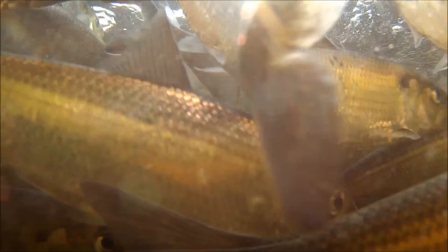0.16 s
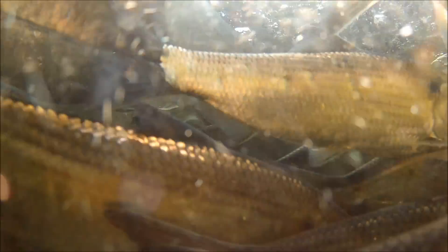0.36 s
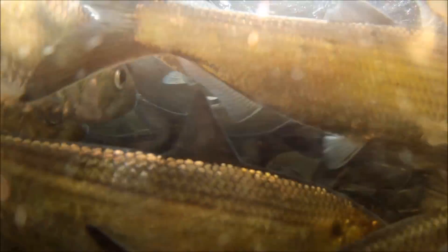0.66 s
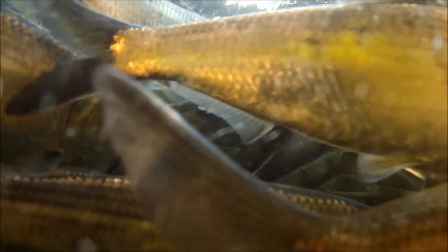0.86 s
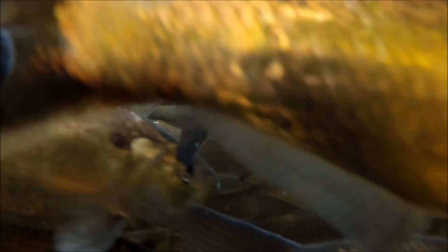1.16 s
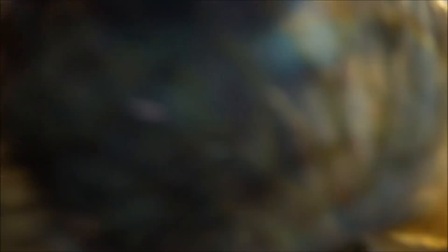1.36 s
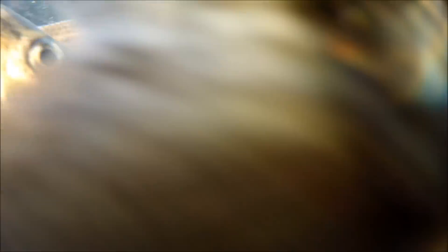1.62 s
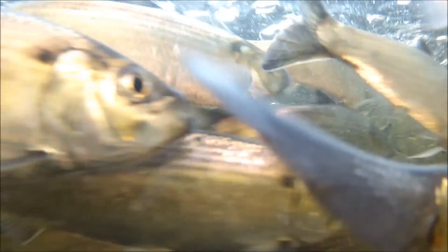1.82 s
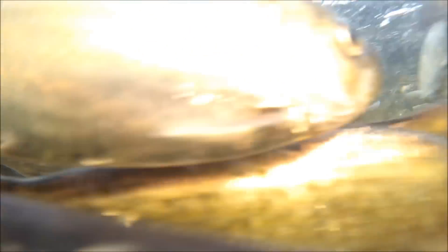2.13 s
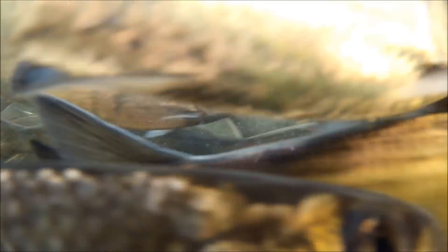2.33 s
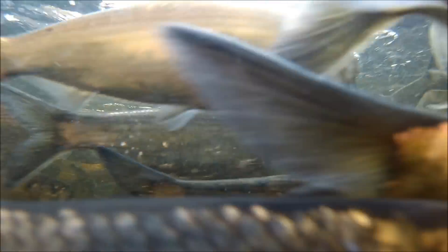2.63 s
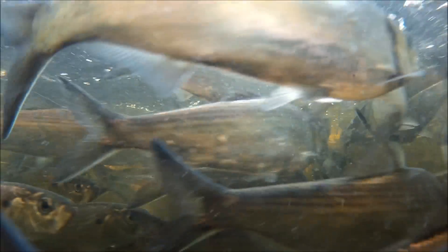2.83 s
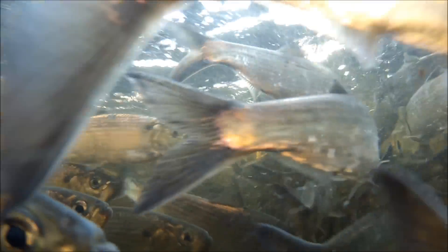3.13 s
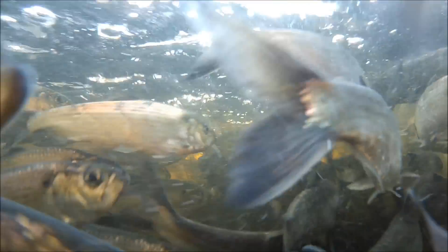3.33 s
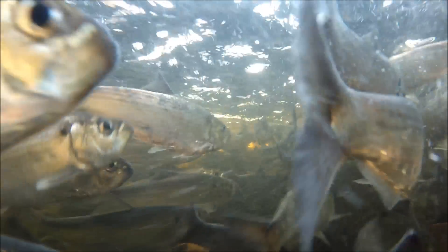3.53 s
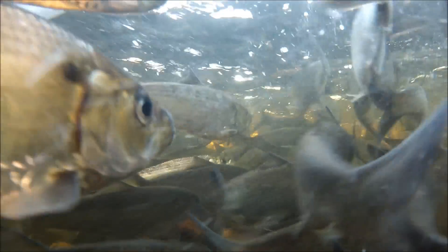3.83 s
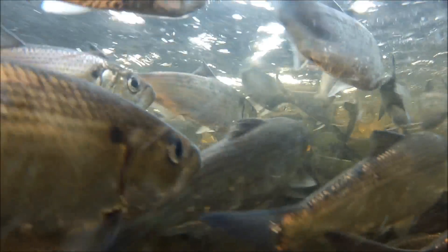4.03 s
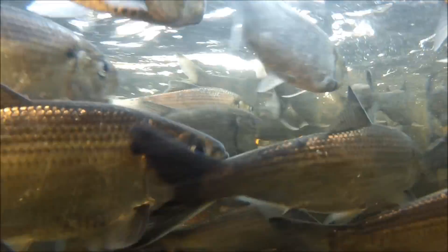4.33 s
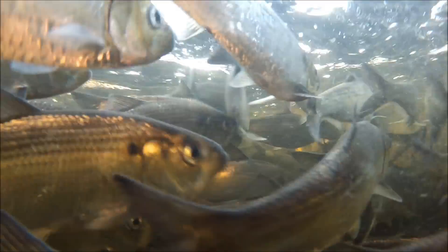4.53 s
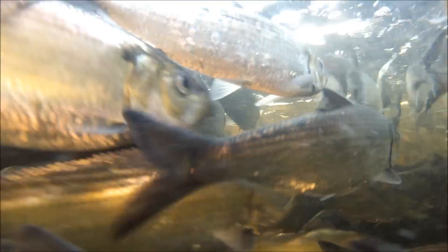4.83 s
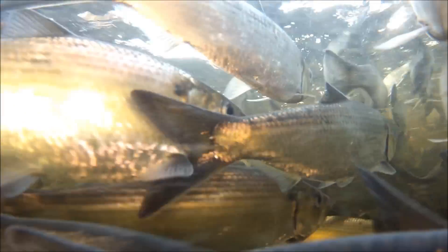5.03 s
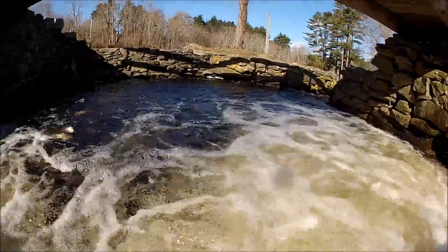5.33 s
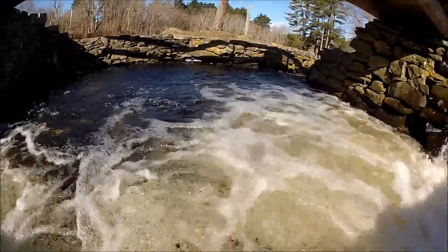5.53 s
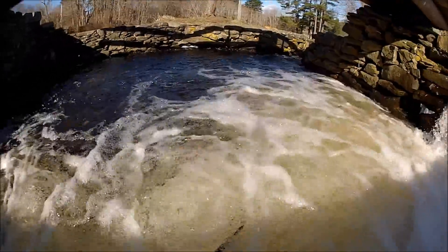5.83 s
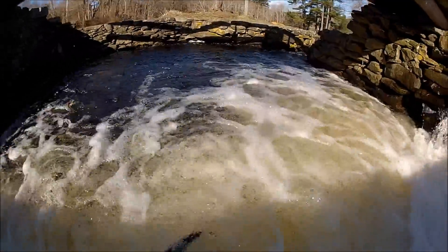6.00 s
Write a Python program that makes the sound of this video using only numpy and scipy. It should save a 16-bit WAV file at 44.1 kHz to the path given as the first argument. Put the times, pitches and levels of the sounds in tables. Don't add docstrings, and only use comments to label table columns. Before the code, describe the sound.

A microphone sealed in a small hard case lies underwater among crowding fish, slowed to quarter speed. At 0.05-0.2 s a rapid cluster of heavy thuds and a hollow knock hits, then low wobbling and soft slosh. Another double thud comes near 0.45 s. From 0.65 to 1.05 s blows crowd together, very loud and overloaded, with boxy ringing around 700 Hz and gritty skids of scales. More hard clunks fall at 1.28-1.4 s and 1.55-1.67 s, amid rumbling eddies and scrapes. Quiet follows; a smaller knock and bumps come at 2.24-2.35 s, a faint scrape and tap at 2.6 s. Until 5.2 s there is mostly dull, low current with sparse tiny ticks. Then an abrupt cut to air: broad churning white water, gurgling and spraying, builds slightly to the end, with a strong surge and low slaps at 5.4-5.5 s and another surge at 5.8 s.

```python
import sys
import numpy as np
from scipy import signal
from scipy.fft import rfft, irfft
from scipy.io import wavfile
from scipy.ndimage import uniform_filter1d

SR = 44100
rng = np.random.default_rng(int(sys.argv[2]) if len(sys.argv) > 2 else 0)


def ratio(d):
    e = np.asarray(d, float) / 20
    return 10 ** e


def store_pcm(level_fs):
    pcm = np.round(np.clip(level_fs, -1, 1) * 32767).astype(np.int16)
    wavfile.write(sys.argv[1], SR, np.atleast_2d(pcm).T)


N = 271656
CHANGE_S = 5.221


def level(x, db=0):
    return x * ratio(db) / np.sqrt(np.mean(x ** 2))


def pole_pair(x, hz, q, band):
    w = 2 * np.pi * hz
    top = [w / q, 0] if band else [1, 0, 0]
    return signal.lfilter(*signal.bilinear(top, [1, w / q, w * w], SR), x)


def walk(rate_hz):
    k = int(SR / rate_hz)
    steps = np.repeat(rng.standard_normal(N // k + 1), k)
    return uniform_filter1d(uniform_filter1d(steps, k), k)[:N]


def colour(points, peaks, lift_db):
    hz = np.fft.rfftfreq(N, 1 / SR) + 1
    centre_hz, db = np.transpose(points)
    bumps = sum(1 / (1 + (2 * (hz - f) / width) ** 2) for f, width, _ in peaks)
    smooth_db = np.interp(np.log(hz), np.log(centre_hz), db, right=-90)
    return hz, ratio(smooth_db + lift_db * bumps)


def wash(hz, gain, swell_db, flicker_db, flicker_hz):
    spectrum = rfft(rng.standard_normal(N)) * gain
    swell = swell_db * walk(1.3)
    out = 0
    for k in range(8, 27):
        mask = np.clip(1 - abs(2 * np.log2(hz) - k), 0, 1)
        out = out + irfft(spectrum * mask, N) * ratio(swell + flicker_db * walk(flicker_hz))
    return level(out)


def swells(t, events):
    rise_db_per_s, fall_db_per_s = 149, 131
    gain = 0
    for s, hold_s, db in events:
        early_s, late_s = np.maximum(s - t, 0), np.maximum(t - s - hold_s, 0)
        gain = gain + ratio(db - rise_db_per_s * early_s - fall_db_per_s * late_s)
    return gain


def add(out, s, x):
    i = int(s * SR)
    out[i:i + len(x)] += x[:N - i]


# centre [Hz], level [dB per Hz]
WEIR = [(12, -37), (20, -11), (81, -2), (144, -10.5), (183, -11.5), (274, -10), (645, -15), (879, -2.5),
        (1040, -9), (1520, -9), (2220, -5.5), (2690, -12.5), (3410, -7.5), (5490, -14.5), (5900, -15),
        (7670, -54.5), (13000, -120)]
# centre [Hz], width [Hz], level [dB], level unused
WEIR_CASE = [(310, 100, -3), (896, 52, 0), (2180, 280, -2), (3300, 520, -1)]
# start_s [s], half_length_s [s], surge_db [dB]
SURGES = [
    (5.437, 0.064, 9.5),
    (5.555, 0.0085, 5),
    (5.588, 0.014, -1),
    (5.803, 0.03, 9),
    (6.026, 0.023, 2.5),
    (6.15, 0.033, 1),
]


def weir(t):
    surge_db = sum(db * np.exp(-((t - s) / half_s) ** 2) for s, half_s, db in SURGES)
    hz, gain = colour(WEIR, WEIR_CASE, lift_db=4)
    low = 1 / (1 + (hz / 140) ** 4)
    mid = 1 / (1 + (hz / 580) ** 6)
    high = 1 / (1 + (2300 / hz) ** 4)
    gurgle_db = -47.5 + 0.62 * surge_db
    rush_db = -40 + 0.16 * surge_db + 5.5 * (t - CHANGE_S)
    spray_db = -41.5 + surge_db
    buffet_db = -48 + 0.78 * surge_db
    gurgle = ratio(gurgle_db) * wash(hz, gain * mid * (1 - low), 0.6, 1.1, 30)
    rush = ratio(rush_db) * wash(hz, gain * high, 0.41, 3.3, 25)
    spray = ratio(spray_db) * wash(hz, gain * (1 - high) * (1 - mid), 0.48, 0.9, 30)
    buffet = ratio(buffet_db) * wash(hz, gain * low, .5, 3.9, 9.6)
    return rush + spray + buffet + gurgle


# start_s [s], level_db [dB], pitch_hz [Hz], t60_s [s]
SLAPS = [
    (5.418, -26, 84, 0.087),
    (5.412, -29.5, 404, 0.12),
    (5.448, -25, 80, 0.12),
    (5.47, -23.5, 83, 0.16),
    (5.584, -32, 64.5, 0.13),
    (5.76, -37, 256, .1),
]


def slaps(t):
    out, t = np.zeros(N), t[:9000]
    for s, db, hz, t60_s in SLAPS:
        add(out, s, ratio(db) * np.sin(2 * np.pi * hz * t) * 1000 ** (-t / t60_s))
    return out


# centre [Hz], level [dB per Hz]
RIVER = [(12, -39), (20, -4), (87, -2), (114, -3), (179, -3), (382, -19), (661, -19), (1010, -32),
         (1420, -29), (2220, -28.5), (2450, -31), (4990, -30.5), (5900, -32.5), (7670, -74.5),
         (13000, -120)]
# centre [Hz], width [Hz], level [dB], level unused
CASE = [(690, 49, 0), (1200, 22, -10), (1720, 27, -10), (2201, 300, -8), (3413, 240, -12)]


def river(blows):
    river_db, recovery_s, duck_level = -52.5, .09, 0.12
    keep = np.exp(-1 / (recovery_s * SR))
    heard = signal.lfilter([1 - keep], [1, -keep], np.minimum(abs(blows), 1))
    current = wash(*colour(RIVER, CASE, lift_db=4.5), 0.4, 2.074, 16)
    return ratio(river_db) * current / (1 + heard / duck_level)


# start_s [s], hold_s [s], level_db [dB]
EDDIES = [
    (-.1, .02, -37),
    (0.186, .02, -44.5),
    (0.474, .22, -38.5),
    (0.879, .13, -44.5),
    (1.14, .1, -55.5),
    (1.317, .03, -32.5),
    (1.455, .25, -36),
    (2.343, .55, -59),
]


def eddies(t):
    rumble = pole_pair(pole_pair(rng.standard_normal(N), 75, 1.2, True), 70, .8, True)
    return level(rumble * ratio(6 * walk(30))) * swells(t, EDDIES)


# start_s [s], hold_s [s], level_db [dB]
SLOSHES = [
    (.03, 0.22, -51.5),
    (.65, .01, -65.5),
    (.85, 0.0045, -41.5),
    (1.24, 0.022, -60),
    (1.58, 0.11, -53),
    (2.27, .06, -54),
    (2.6, 0.016, -54),
]


def sloshes(t):
    slosh = pole_pair(pole_pair(rng.standard_normal(N), 390, 0.92, True), 280, 0.96, True)
    return level(slosh * ratio(5 * walk(49))) * swells(t, SLOSHES)


# start_s [s], level_db [dB], pitch_hz [Hz], t60_s [s]
ROCKING = [(0.138, -28, 100, .1), (0.191, -29.5, 111.6, 0.26), (0.465, -24, 90.3, 0.36),
           (1.34, -24, 84.7, 0.58), (1.67, -22.5, 85.7, 0.22), (1.394, -29, 92, 0.16),
           (1.439, -34, 95, 0.18), (1.701, -28.5, 84.5, 0.22), (1.79, -35.5, 48.1, 0.65),
           (2.375, -31.5, 53.7, 0.18), (2.601, -35.5, 59.3, 0.16), (0.272, -36, 140, 0.29)]


def rocking():
    out, t = np.zeros(N), np.arange(SR // 2) / SR
    wander = 1 + .25 * walk(40)
    for s, db, hz, t60_s in ROCKING:
        turns = np.cumsum(hz * wander[int(s * SR):][:len(t)]) / SR
        add(out, s, -ratio(db) * np.sin(2 * np.pi * turns) * 1000 ** (-t / t60_s))
    return out


# centre [Hz], level [dB per Hz]
GRIT = [(150, -20.5), (600, 0.5), (1500, -7), (3000, -7), (4500, -16), (5800, -11)]


def grit():
    unevenness_db = 5.6 * rng.standard_normal(N // 40 + 1).repeat(40)[:N]
    clicks = rng.standard_normal(N) * ratio(unevenness_db)
    _, gain = colour(GRIT, CASE, lift_db=7)
    return level(irfft(rfft(clicks) * gain, N))


# start_s [s], length_s [s], grit_db [dB], hum_db [dB]
SCRAPES = [(0.184, 0.0065, -55, -48), (0.186, 0.17, -59.5, -50.5), (.307, 1, -66.5, -84.5),
           (0.452, 0.017, -51, -50), (.537, 0.085, -63, -70), (0.645, 0.005, -37, -44.5),
           (0.669, 0.011, -31.5, -25), (0.754, 0.017, -33.5, -30), (1.011, .012, -32, -42),
           (1.026, 0.014, -38.5, -38.5), (1.192, 0.062, -68.5, -53.5), (1.242, .025, -45.5, -30),
           (1.314, 0.0047, -48, -57.5), (1.3245, 0.01, -23.5, -22.5), (1.337, 0.026, -41, -49),
           (1.371, 0.014, -45.5, -48), (1.469, .03, -65, -58), (1.526, 0.023, -36, -41),
           (1.559, 0.018, -34, -28.5), (1.6262, 0.012, -19.5, -27.5), (1.6496, .0021, -1, -33),
           (1.651, 0.015, -20.5, -32), (1.667, 0.017, -50, -43.5), (2.249, 0.14, -77, -55),
           (2.578, 0.02, -67.5, -52), (2.598, 0.038, -54.5, -52), (4.124, 0.014, -65, -68.5),
           (4.321, 0.0077, -55.5, -48.5)]
# start_s [s], grit_db [dB]
SKIDS = [
    (.4365, -35),
    (.746, -28),
    (.775, -34),
    (.784, -36.5),
    (.81, -33),
    (.827, -28),
    (0.8418, -30.5),
    (.905, -33.5),
    (.996, -22.5),
    (1.2795, -21.5),
]


def scrapes(rough):
    skid_s, skid_hum_db = .006, -32.5
    hum = level(pole_pair(pole_pair(rng.standard_normal(N), 705, 8, True), 690, 2.0, True))
    out = np.zeros(N)
    skids = [(s, skid_s, db, skid_hum_db) for s, db in SKIDS]
    for s, length_s, grit_db, hum_db in list(SCRAPES) + skids:
        t = np.arange(int((length_s + .02) * SR)) / SR
        onset = np.minimum(t / (0.068 * length_s), 1)
        release = np.exp(-np.maximum(t - 0.55 * length_s, 0) / (.25 * length_s))
        i = int(s * SR)
        drag = ratio(grit_db) * rough[i:i + len(t)] + ratio(hum_db) * hum[i:i + len(t)]
        add(out, s, onset * release * drag)
    return out


def soften(rough):
    return level(pole_pair(pole_pair(rough, 1150, 0.97, True), 1150, 0.97, True))


# start_s [s], level_db [dB], pitch_hz [Hz], decay_ms [ms]
TICKS = [(1.314, -44, 1900, 1.5), (1.371, -31, 2140, 1.9), (1.421, -48, 1170, 4.3), (1.553, -45, 3480, 1.8),
         (1.657, -23.5, 2018, 3.1), (2.004, -52, 1277, 3.55), (3.086, -49, 797, 4.5),
         (3.452, -52.5, 1154, 4.4), (3.466, -50, 815, 3.9), (3.84, -45, 1197, 3.67),
         (3.95, -50.5, 669, 4.8), (4.18, -48.5, 2010, 4.75), (4.324, -51.5, 804, 1.6),
         (4.33, -49, 2115, 4.7), (5.179, -46, 3400, 1.9), (.002, -45, 1618, 3), (0.872, -29.5, 2930, 1.8),
         (1.28, -24, 2790, 1.8), (.744, -13, 2920, 2.04)]


def ticks(dull):
    out, ms = np.zeros(N), np.arange(2000) / SR * 1000
    for s, db, hz, decay_ms in TICKS:
        swing = np.exp(-ms / decay_ms) * (1 - np.exp(-ms / 0.38))
        roughness = 1 + .5 * dull[int(s * SR):][:len(ms)]
        add(out, s, ratio(db) * np.sin(2 * np.pi * hz * ms / 1000) * swing * roughness)
    return out


# start_s [s], push [full scale], contact_ms [ms]
THUDS = [(.0683, 1.1, 4.6), (.082, 1.05, 4.6), (.0996, 1.5, 4.6), (.1177, 1.23, 4.7), (.1826, .24, 6.2),
         (.4368, .84, 4.1), (.4563, .56, 5.7), (.7408, 2.92, 5.9), (.7585, -.55, 6), (.7797, 1.84, 4.3),
         (.8553, 1.08, 6.2), (.8714, 1.09, 6.6), (1.338, -.12, 7), (1.5598, .77, 4.2), (1.6515, -1.2, 7),
         (2.254, .05, 6), (2.262, .08, 6), (2.271, .14, 6), (2.295, .06, 8), (2.326, .04, 8)]
# start_s [s], push [full scale], contact_ms [ms], ring [full scale], ring_hz [Hz]
KNOCKS = [(.0511, 4.09, 3.6, .01, 713), (.6685, -.12, 1.2, .19, 745), (.764, .37, 2.9, .3, 760),
          (.8072, 2.01, 4.5, .18, 802), (.8269, 3.17, 4.8, .6, 656), (.8413, 3.68, 5.1, .54, 778),
          (.9034, 2.08, 3.3, .42, 686), (.9916, 1.87, 3.1, .01, 693), (1.0115, .49, 1.3, 1.1, 716),
          (1.03, .18, 1.3, .47, 722), (1.2791, 2.12, 5.8, 1.6, 834), (1.2796, -2, 2.4, .1, 700),
          (1.2808, 2.2, 3.2, .1, 700), (1.325, -.61, 2.7, .34, 913), (1.3814, -3.11, .3, 2.8, 624),
          (1.6255, 3.2, 4.7, .7, 682), (1.6486, 2.73, 3.3, 1.0, 617), (2.2402, .4, 3.4, .01, 700),
          (2.2411, .52, 6.7, .27, 690)]
# start_s [s], ring [full scale], ring_hz [Hz], decay_ms [ms]
TAPS = [
    (.646, .03, 800, 2),
    (.0511, 2.5, 680, 1.2),
    (.9916, 3, 693, 2.7),
    (.672, .1, 700, 3),
    (.7755, .1, 750, 2.5),
    (.9929, 1.6, 720, 1.8),
    (1.3835, .25, 720, 4.5),
    (2.3498, .18, 788, 1.9),
    (2.605, .02, 650, 5),
    (2.609, .014, 380, 6),
]


def contacts():
    thuds = [(s, push, c, .36 * push * (5.5 / c) ** 2, 533, 0.88) for s, push, c in THUDS]
    hard = [(s, push, c, ring, hz, 3.4 / (1 + 0.41 * ring)) for s, push, c, ring, hz in KNOCKS]
    taps = [(s, 0, 1, ring, hz, decay_ms) for s, ring, hz, decay_ms in TAPS]
    return thuds + hard + taps


def knocks(rough, dull):
    flex_hz, flex_q = 285, .44
    lag_ms, rise_ms = .2, .6
    upper_hz, upper_db, upper_decay_ms = 1014, -12.5, 1
    flex, out, ms = np.zeros(N), np.zeros(N), np.arange(2000) / SR * 1000
    for s, push, contact_ms, ring, hz, decay_ms in contacts():
        i = int(s * SR)
        add(flex, s, -push * np.sin(np.pi * ms / contact_ms) ** 2 * (ms < contact_ms))
        t_ms = np.maximum(ms - lag_ms, 0)
        rise = 1 - np.exp(-(t_ms / rise_ms) ** 1.5)
        upper = np.sin(2 * np.pi * upper_hz * t_ms / 1000) * rise * np.exp(-t_ms / upper_decay_ms)
        add(out, s, np.tanh(ring) * ratio(upper_db) * upper)
        swing = rise * (np.exp(-t_ms / decay_ms) - ratio(-33.0) * np.exp(-t_ms / 8))
        add(out, s, ring * np.sin(2 * np.pi * hz * t_ms / 1000) * swing)
        touch = (t_ms > 0) * np.exp(-t_ms / 2.4)
        release = .5 * np.exp(-((ms - contact_ms) / 1.9) ** 2)
        add(out, s, ratio(-40.0) * abs(push) ** 2.44 * (touch + release) * dull[i:][:len(ms)])
        hard_edge = (t_ms > 0) * np.exp(-t_ms / 2.3) * rough[i + len(ms):][:len(ms)]
        add(out, s, ratio(-28.5) * abs(ring) ** 1.9 * hard_edge)
    return pole_pair(flex, flex_hz, flex_q, True) + out


def scene():
    mic_hz, mic_q = 44, .49
    t = np.arange(N) / SR
    rough = grit()
    dull = soften(rough)
    struck = pole_pair(knocks(rough, dull) + ticks(dull), mic_hz, mic_q, False)
    blows = struck + scrapes(rough) + rocking()
    under = blows + eddies(t) + sloshes(t) + river(blows)
    above = np.clip((t - CHANGE_S) / 0.0065, 0, 1)
    return (under * (1 - above) + (weir(t) + slaps(t)) * above)[None]


def thin(x, mask_db):
    hz, _, z = signal.stft(x, SR, nperseg=2048)
    power = uniform_filter1d(abs(z) ** 2, size=10, axis=1)
    around = uniform_filter1d(power, size=200, axis=1)
    limit_db = mask_db + 5.5 * np.clip(hz / 4000 - 2, 0, 1)[:, None]
    keep = (power > around * ratio(2 * limit_db)) | (hz < 5000)[:, None]
    keep |= power.sum(axis=1, keepdims=True) > ratio(-50)
    return signal.istft(z * keep, SR, nperseg=2048)[1][:, :N]


def low_pass(x):
    return signal.sosfilt(signal.butter(12, 16470, fs=SR, output="sos"), x)


def record(dry):
    edge_hz, hold_hz, out_hz = 5700, 12000, 48000
    x = signal.sosfiltfilt(signal.butter(4, edge_hz, fs=SR, output="sos"), dry)
    slow = signal.resample_poly(x, hold_hz, SR, axis=1, window=("kaiser", 3.))
    slow = np.clip(slow, -1.1, 1.1)
    held = np.repeat(slow, out_hz // hold_hz, axis=1)
    held = signal.resample_poly(held, SR, out_hz, axis=1)[:, :N]
    edged = signal.sosfiltfilt(signal.ellip(8, .1, 40, 15200, fs=SR, output="sos"), held)
    mix = np.clip(thin(edged, mask_db=-13), -1, 1)
    return low_pass(mix)


dry = scene()
out = record(dry)
store_pcm(out)
```